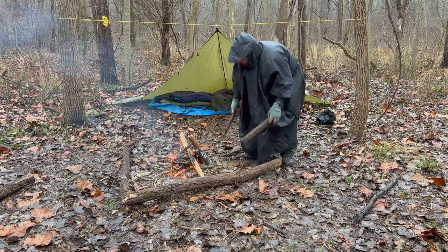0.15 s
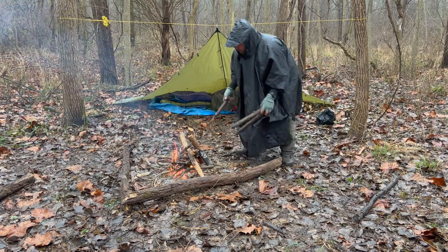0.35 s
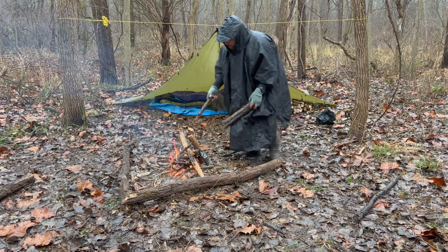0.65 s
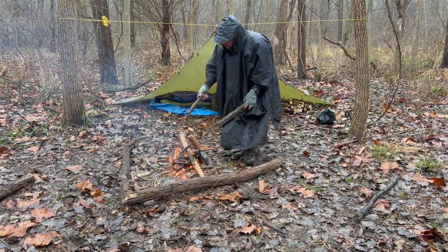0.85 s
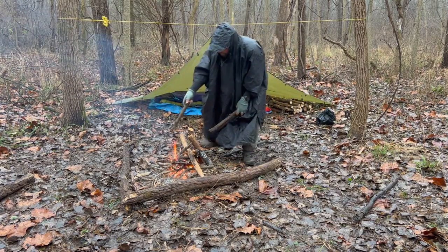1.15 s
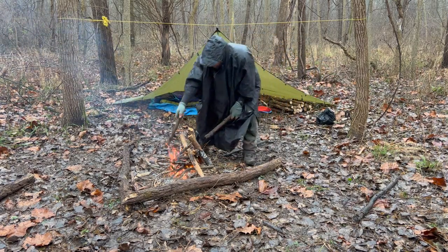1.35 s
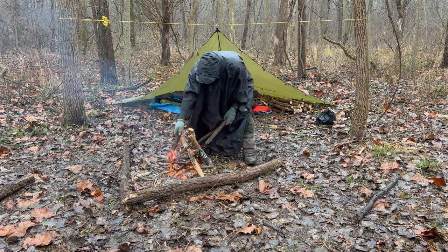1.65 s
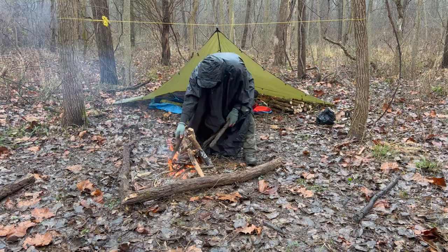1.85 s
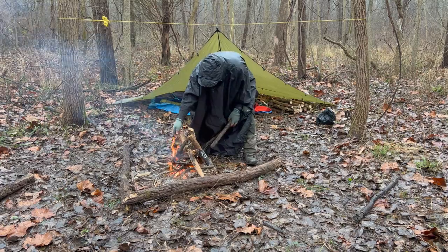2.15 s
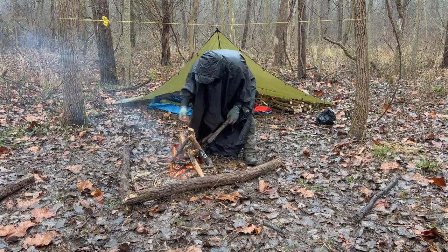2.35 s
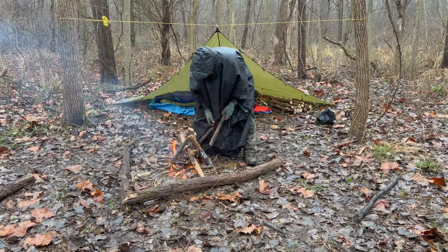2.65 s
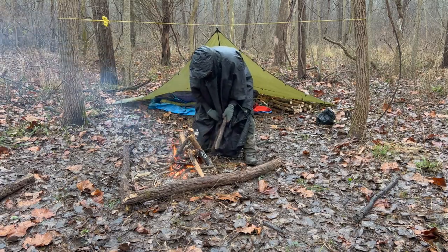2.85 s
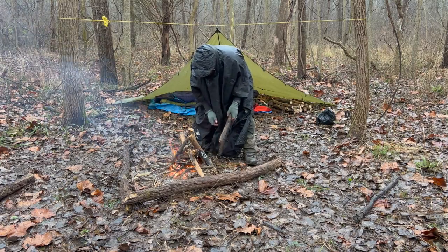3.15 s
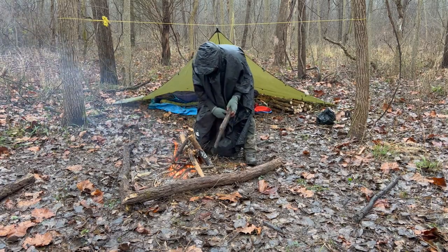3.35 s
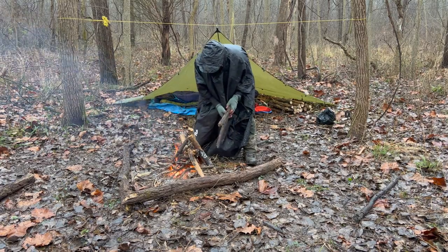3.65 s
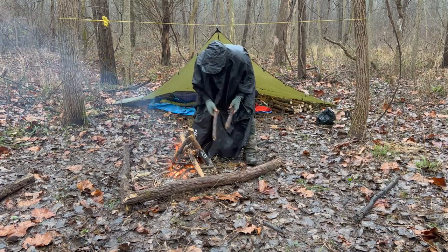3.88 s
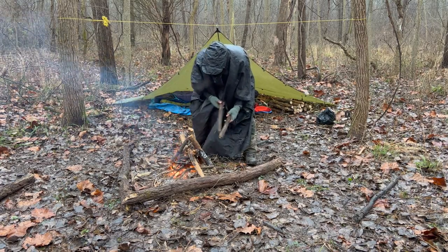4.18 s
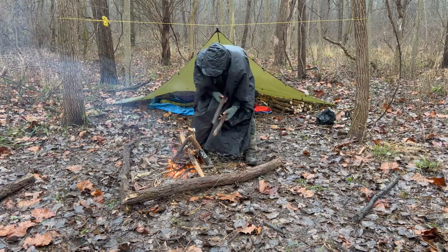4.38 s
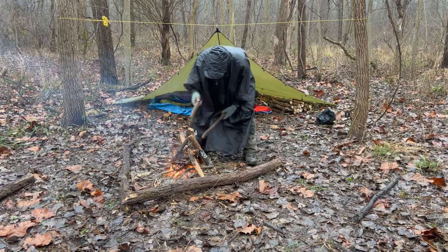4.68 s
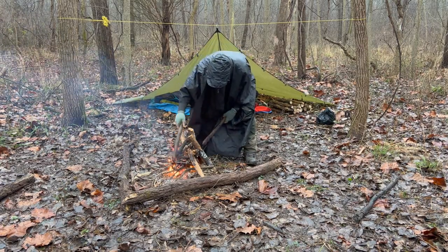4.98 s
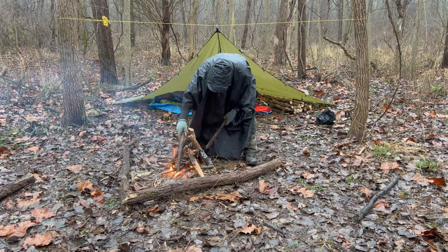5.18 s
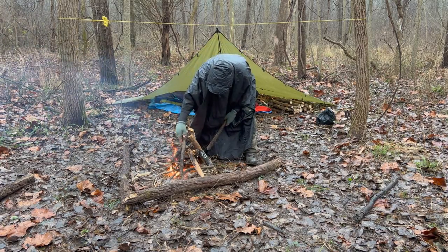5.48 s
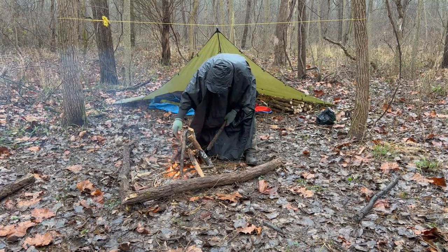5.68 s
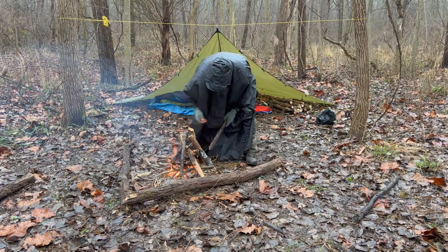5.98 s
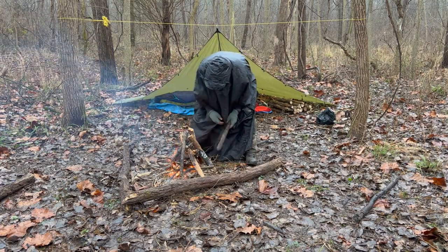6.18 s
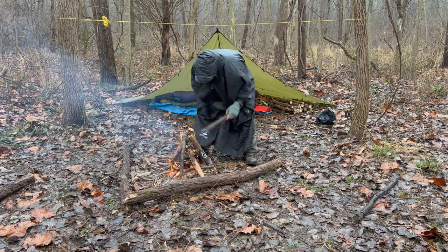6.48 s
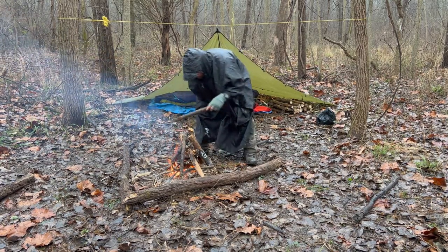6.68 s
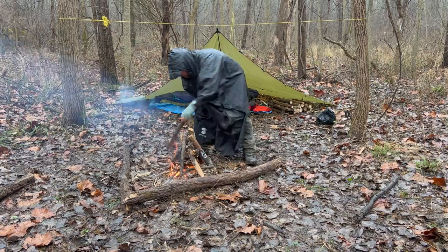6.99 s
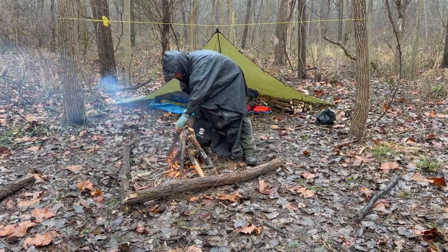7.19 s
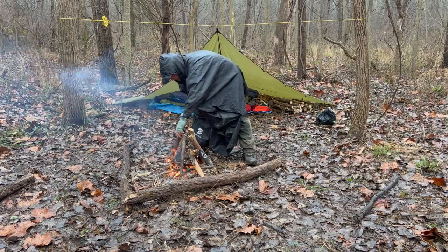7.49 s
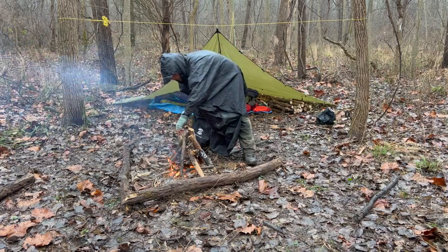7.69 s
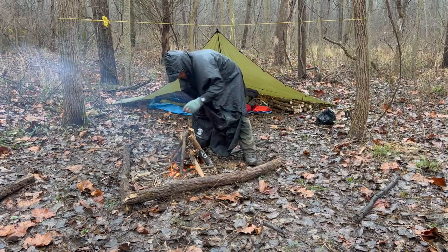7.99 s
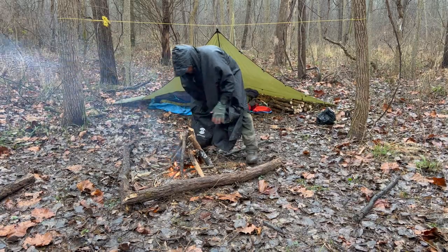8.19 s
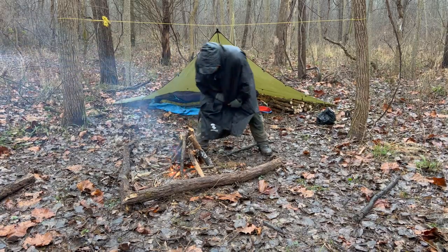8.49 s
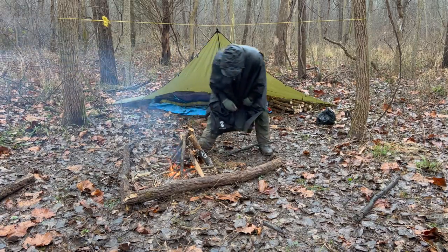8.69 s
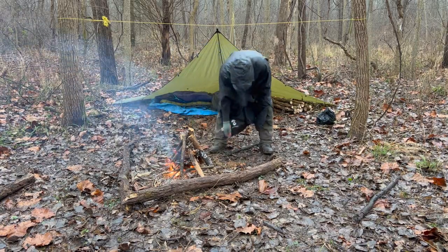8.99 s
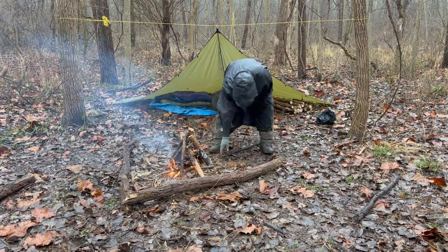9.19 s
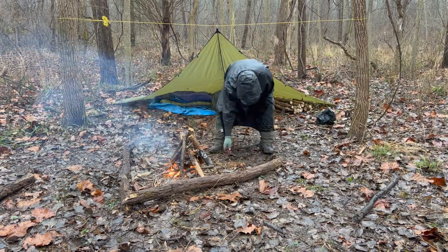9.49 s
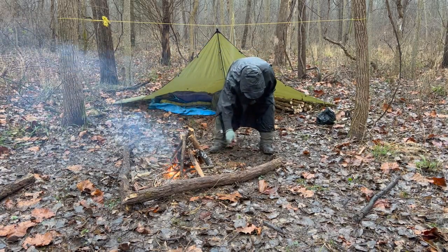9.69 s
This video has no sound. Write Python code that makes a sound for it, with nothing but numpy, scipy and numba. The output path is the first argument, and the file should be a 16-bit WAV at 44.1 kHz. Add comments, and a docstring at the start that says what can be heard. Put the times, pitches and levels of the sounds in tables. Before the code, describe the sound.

Close, irregular drips and fire snaps over fine woodland rain, with soft cloth swishes, a distant low rumble and one brief high bird trill.

```python
"""Rain in a bare wood

Heavy drips tap a taut cover close to the microphone and a small fire snaps nearby: layered damped rings and noise.
Fine drops patter on leaf litter as random clicks, amid rustling and soft swishes of cloth and leaves.
Behind lie a far hiss and a low rumble of coloured noise; a small bird trills once, high up, in gliding sines."""
import sys
import numpy as np
from scipy import signal
from scipy.fft import rfft, irfft
from scipy.io import wavfile
from scipy.ndimage import uniform_filter1d
from numba import njit

SR = 44100
rng = np.random.default_rng(int(sys.argv[2]) if len(sys.argv) > 2 else 0)


def bounce(signal):
    """Save signal as a 16-bit WAV file at the path given by the first command-line argument."""
    frames = np.transpose(np.atleast_2d(signal))
    limited = np.clip(frames, -1, 1)
    pcm = np.round(limited * 32767).astype(np.int16)
    wavfile.write(sys.argv[1], SR, pcm)


N = 433924

# Close taps and snaps. Each row: start in seconds, reference level in dB, nominal ring pitch in Hz,
# then thump, knock, crack and top of the crack in dB re the reference, left minus right in dB.
CLOSE_TAPS = [(0.109, -31.5, 2460, -25, 6, -10, -32, -1.5), (0.283, -35, 2000, -23, -12, -14, -22, 11),
              (0.411, -37, 1620, -4, 8, -8.5, -27, -2.5), (0.49, -25.5, 1560, -17, -18, -9, -10, -1.5),
              (0.65, -37, 2340, -5, 8, -21, -25, 0), (0.854, -36.5, 5140, -6, -14, -10, -25, -4.5),
              (0.944, -33, 1670, -7, -11, -5, -3, 3), (1.1555, -25, 2110, -28, 4, -4, -26, 7.5),
              (1.291, -38.5, 1610, 3, 3, 1, -22, 2), (1.4305, -30.5, 3500, -17, -3, -19, -25, -1),
              (1.436, -25, 2300, -26, -16, -12, -22, 3), (1.474, -30.5, 5240, -20, -20, -3.5, -13, -2),
              (1.546, -34, 2900, -21, -9, 1.5, 5, 3.5), (1.5615, -42, 1000, 2, 15, -16, -25, -2),
              (1.569, -35.5, 4840, -10, -18, 2.5, -23, 6), (1.608, -35.5, 2850, -2, 6, 3, 1, 3),
              (1.666, -44.5, 1000, -9, -6, -2, 1, 1.5), (1.772, -41.5, 1020, -2, 22, -2.5, -24, -1.5),
              (1.926, -29.5, 3000, -28, 4, -9, -18, -2.5), (1.981, -37.5, 990, -17, -19, -5, -24, 15),
              (2.056, -42.5, 1330, -6, -10, 5, -25, -2.5), (2.153, -38, 1150, -11, -5, -13, -29, 3),
              (2.351, -32.5, 1580, -15, -18, -10, -16, 3.5), (2.39, -28, 5100, -4.5, 3.5, -11, -22, -0.5),
              (2.478, -34, 2000, -2, -7, -15, -23, 1), (2.664, -28.5, 1580, -16, -16, -7, -24, -3),
              (2.775, -34, 1060, -1, -14, -6, -25, 2.5), (3.032, -30.5, 1520, -7, -18, -7.5, -22, -2),
              (3.373, -36, 1120, -20, -12, -7, -29, -2.5), (3.416, -29, 1670, -15, -14, -2, -8, 3.5),
              (3.5015, -45, 2300, -10, -4, -8, -20, -4), (3.57, -44, 1300, -8, -8, -2.5, -22, -3),
              (3.795, -37, 1810, -11, -8, -13, -25, -3), (3.767, -38, 1150, -7, -6, -6, -13, -2.5),
              (4.112, -40.5, 1060, 1, -13, 4.5, -27, -2), (4.3, -38, 1070, 0, -6, -16, -18, 2.5),
              (4.355, -27, 1810, 6.5, 10, -4, -15, -1.5), (4.685, -38, 1130, 5.5, 11, -23, -23, 0),
              (4.809, -34, 2100, -16, -16, -4, -22, -5), (4.965, -25.5, 2800, -19, -19, -17, -26, -8.5),
              (5.183, -29.5, 4750, -8, -18, -5.5, 8, 1), (5.494, -34.5, 1200, -19, 12, -3, -24, -4.5),
              (5.6972, -12, 1460, -5, 5.5, -6.5, -33, 0), (5.846, -23, 1410, -2, -1, 1.5, -19, -1.5),
              (5.988, -25, 1170, -5.5, -7, -0.5, -34, 8.5), (6.081, -23.5, 5100, -12, -6, -14, -21, 1),
              (6.121, -31.5, 1310, -0.5, -10, -1, -27, 2), (6.214, -28, 1950, -22, -19, -14.5, -25, -11),
              (6.31, -26.5, 1620, -13, -3, -13, -32, -6), (6.467, -34, 7400, -22, -12, -9, -11, -1),
              (6.541, -31, 1970, -22, -16, -11, -16, 8), (6.606, -39, 6400, -10, -14, -3, -16, -4.5),
              (6.652, -30.5, 1730, -20, -12, -11, -27, -3.5), (6.681, -34.5, 1630, -2, -7, -6, -29, -1.5),
              (6.913, -36, 1390, -11, 9, -6, -20, -2), (6.937, -37, 1220, -14, 18, -0.5, -26, -3),
              (7.151, -34.5, 1370, -8, -7, -1, -11, 5), (7.174, -22.5, 1170, -5.5, 12.5, -7.5, -25, -2),
              (7.204, -30.5, 1150, -8, -9, -14, -21, 3), (7.236, -31, 1150, -5, 14, 5, -13, 3),
              (7.284, -33, 1790, -9, 7, -6, -19, 8.5), (7.427, -33, 1400, -6, 4, -10, -25, 5),
              (7.766, -47.5, 2490, -1, -8, 9, 13.5, 2), (7.815, -10.5, 1960, 0.5, -29, -12, -18, -2),
              (7.917, -27, 1720, -17, -17, -11, 0, 2.5), (7.997, -34, 4400, -13, 1, -4, -17, 8),
              (8.025, -26.5, 1520, -12, -5, -8, -34, -2.5), (8.286, -28, 2630, -17, -23, -7, -11.5, -1.5),
              (8.32, -33, 3300, -13, -18, -7, -18, 0), (8.367, -35.5, 1540, -1, -10, -4, -17, 4),
              (8.408, -35, 2260, -7, -10, -5, -10, 3), (8.663, -41, 2770, -12, -9, -5, 0, 1),
              (8.627, -41.5, 4850, -1, -8, 5, -17, 6.5), (8.711, -37, 5300, -14, -12, -9, -22, -1),
              (8.853, -45, 1100, 3, 0, -12, -25, 0), (8.892, -56, 1450, -10, -8, -1, -22, 0),
              (8.93, -41, 1300, -10, -4, -12, -25, -4), (8.938, -41, 1500, -10, -6, -12, -25, -2),
              (8.918, -37, 1640, -3, -10, -6, -17, -1), (8.968, -28.5, 2620, -11, 5, -5, -13, 4.5),
              (8.9873, -10, 1780, 4.5, 1, -11.5, -19.5, -2), (9.057, -34.5, 1530, -11, 15, -1.5, -25, -3),
              (9.076, -35, 3500, -10, -15, -6, -20, 0.5), (9.097, -28.5, 2880, -14, -5, -29, -23, -2.5),
              (9.162, -29, 1790, -20, -8, -8, -17, -0.5), (9.205, -17, 1290, -6.5, -26, -4, -27, 1.5),
              (9.269, -32.5, 2670, -18, -18, -8.5, -22, -8.5), (9.281, -32.5, 2000, -20, -12, -8, -11, 0.5),
              (9.325, -34.5, 1720, -9, 4, -10, -10, 3.5), (9.4966, -5, 2210, -3, 8.5, -18.5, -27.5, 0.5),
              (9.621, -24.5, 1350, 3, -13, -5, -35, -5.5), (9.711, -33, 3580, -18, 9, -8, -23, 7),
              (9.723, -34.5, 2500, -15, -10, 3, -20, 2.5), (9.757, -31, 1120, -5, 13.5, -11, -19, -0.5),
              (9.831, -34, 1690, -17, -9, -10, -11, -1), (0.1705, -41, 1280, -2, -12, -6, -22, -5),
              (0.181, -43.5, 1360, -2, -10, 2, -22, 1), (0.2254, -44, 2170, -12, -13, -10, -22, -1),
              (0.2658, -39, 2050, -13, -10, -3.5, -16, 1), (0.3017, -37.5, 3540, -10, -10, -8, -16, 0),
              (0.6893, -37, 1390, -5, -10, -7, -30, -5), (0.7836, -43.5, 1530, 1, -10, 4, -18, 4.5),
              (0.9807, -40, 1970, 2, -10, -7, -20, 0), (1.05, -43, 1110, 1, -10, -2.5, -11, -5),
              (1.1962, -35, 1650, -2.5, -10, -5, -16, -4), (1.4566, -36, 2050, -8, -8, -25, -24, -6),
              (1.7494, -35, 2400, -5, -10, -19, -25, -2.5), (1.8188, -37.5, 1710, -3, -7, -8, -26, -2),
              (1.8761, -38, 1970, -11, -12, -17, -22, -1), (2.9637, -41, 1490, -10, -10, -6, -10, -3.5),
              (3.244, -38, 1530, -13, -10, -10, -22, -4), (3.7214, -41, 1110, -7, -10, -5, -11, -3),
              (4.3181, -36, 2290, -7, -10, -12, -17, 0), (4.4448, -48, 2460, -10, -12, -12, -22, -9),
              (4.4608, -44, 1540, -8, -10, 4.5, -13, -2), (4.5057, -39.5, 1030, -5, -10, -13, -22, -1),
              (5.1412, -38.5, 1900, -1, -9, -5, -22, -3), (5.3048, -39.5, 942, 0, -10, -14, -22, -1.0),
              (5.4051, -47, 1270, -10, -12, -10, -22, -13), (5.4665, -40, 2930, -7, -13, -14, -30, -7),
              (5.7633, -36, 3650, -16, -10, -7, -22, -2.5), (5.902, -37, 1640, -2, -10, -16, -22, -4),
              (6.0724, -34.5, 5140, -10, -10, -12, -15, -1.5), (6.102, -44, 3830, -10, -10, -13, -22, -5.5),
              (6.1114, -31, 1050, -10, -10, -23, -25, -8), (6.1464, -39, 1120, -10, -10, -13, -22, -1),
              (6.1823, -37, 1420, -10, -10, -15, -19, 1), (6.2387, -40, 1130, -10, -10, -1, -22, 3),
              (6.2652, -35, 2580, -16, -10, -10, -13, -4.5), (6.3274, -39.5, 1120, -16, -10, -5, -22, -2.5),
              (6.3844, -36.5, 1370, -8, -8, -2.5, -14, -2), (6.4193, -38, 1560, -14, -10, -7, -22, -3),
              (6.4487, -39.5, 2470, -1, -10, -4, -22, -5.5), (6.4867, -43, 3210, -7, -10, 2, -22, -3),
              (6.5071, -41, 1830, -4, -6, -0.5, -22, -9), (6.5291, -41, 2000, -12, -10, 1, -22, -1),
              (6.8194, -40, 3070, -3, -10, -8, -18, -7), (6.9711, -41, 2040, -5, -10, -17, -18, 0),
              (7.0244, -36.5, 1920, -6, -10, -12, -18, 0), (7.4799, -45, 2010, -10, -10, -2, -16, -4),
              (7.6909, -40, 2180, -16, -10, -13, -22, 0), (7.8496, -31, 5280, -12, -10, -6, -20, -3),
              (8.093, -41, 1150, -14, -10, -3, -22, -1), (8.4682, -37, 974, -10, -10, -6, -18, -2.5),
              (9.0428, -36, 1530, -7, -10, -18, -26, -8), (9.1401, -34.5, 1470, -8, -6, -4, -22, -3.5),
              (9.3846, -38, 1390, -10, -10, -6, -13, -5.5), (9.5437, -44, 982, -2, -10, -12, -19, 0),
              (9.5731, -43, 1820, -13, -10, -2, -15, 1)]
# Bird notes. Each row: start in seconds, length in seconds, first, middle and last pitch in Hz, relative level in dB.
BIRD_NOTES = [(4.934, 0.12, 7900, 8240, 7880, -52.5), (5.113, 0.11, 8400, 8300, 8320, -54.5),
              (5.282, 0.12, 8400, 8330, 8100, -55.5)]
# Tone colour of far rain, with a traffic-like rumble at the bottom. Each row: frequency in Hz, relative density in dB.
FAR_COLOUR = [(20, -26), (50, 1.5), (74, 7.5), (95, 0), (120, -3), (200, -11.5), (320, -16), (550, -21),
              (900, -21.5), (2050, -21.5), (4000, -27.5), (6300, -24.5), (8000, -29), (9600, -35),
              (11500, -31.5), (13200, -32), (15500, -69), (17000, -73)]
# Rustle of the rain cape and of leaves underfoot. Each row: time in seconds, relative level in dB.
RUSTLE_LEVEL = [(0.0, -54.5), (0.63, -53.5), (1.75, -54), (2.19, -58), (2.63, -53), (3.07, -55.5),
                (3.3, -52.5), (4.08, -54), (4.33, -47.5), (4.66, -54), (5.45, -53.5), (6.22, -46),
                (6.69, -50.5), (7.18, -48.5), (7.55, -54.5), (7.97, -49), (9.12, -49.5), (9.54, -48),
                (9.84, -50.5)]
# Soft swishes of cloth and leaves. Each row: start in seconds, relative level in dB.
SWISH_HITS = [(.76, -37.5), (1.22, -39.5), (2.47, -38.5), (6.09, -33.5), (6.3, -37.5), (6.45, -45),
              (8.2, -45.5), (8.33, -39.5), (8.43, -42), (8.68, -38), (8.76, -45), (8.82, -43),
              (9.71, -36.5)]

SLAP_DB = -7  # a blow beyond this level rings louder but shorter
BOOM_FULL_DB = -15.5  # a thump beyond this level adds no more boom
WOOD_FULL_DB = -25  # a tap beyond this level adds no more wooden ring
LAG_S_PER_DB = -.00004  # the port that hears a tap louder hears it first
FAINT_PER_S, FAINT_LO_HZ, FAINT_OCTAVES = 6., 990, 2.5
FAR_DB, ALIKE_HZ = -51, 302  # far level; left and right largely agree below this frequency
BIRD_ATTACK_S, BIRD_FADE_DB = 0.012, -7  # fade over one note
SHADE_HZ, SHADE_OCTAVES, SHADE_DB = 5300, 0.67, -4.5  # centre, width, left minus right
TOP_HZ = 16600


def undb(db):
    """Turn decibels into an amplitude factor."""
    return 10 ** (np.asarray(db) / 20)


def curve(rows):
    """Draw straight lines through rows of (seconds, value), one value per sample."""
    times_s, values = np.transpose(rows)
    return np.interp(np.arange(N) / SR, times_s, values)


def walk(rate):
    """Random levels held 1 / rate s and smoothed twice; spread near 1."""
    hold = int(SR / rate)
    steps = np.repeat(rng.standard_normal(N // hold + 1), hold)
    return 1.3 * uniform_filter1d(uniform_filter1d(steps, hold), hold)[:N]


@njit
def ring(out, start, hz, cycles, fall, size, swell):
    """Damped grains: each swells over `swell` turns, loses 1/e in `cycles` turns and sinks by `fall` a turn."""
    for k in range(len(start)):
        f, phase, gain, i = hz[k] / SR, 0., size[k], int(start[k] * SR)
        while abs(gain) > .003 * abs(size[k]) and i < len(out):
            if i >= 0:
                out[i] += gain * (1 - np.exp(-phase / swell)) ** 2 * np.sin(2 * np.pi * phase)
            phase += f
            gain *= 1 - f / cycles[k]
            f *= 1 - f * fall
            i += 1


def grains(s, hz, db, pan_db, cycles, fall, lag_s, sign=0.98, swell=0.26):
    """Damped grains for both ports, panned by level; the left one hears them lag_s later."""
    out = np.zeros((2, N))
    hz = np.clip(hz, 40, .4 * SR)
    settings = np.broadcast_arrays(s, hz, db, pan_db, lag_s, sign, cycles)
    s, hz, db, pan_db, lag_s, sign, cycles = map(np.ravel, settings)
    for port, way in enumerate((.5, -.5)):
        size = sign * undb(db + way * pan_db)
        ring(out[port], s + way * lag_s, hz, cycles, fall, size, swell)
    return out


def burst(s, db, pan_db, lo_hz, hi_hz, spread_s, cycles, tilt_db, lag_s, count):
    """A cluster of tiny clicks for each event, spread over the octaves; tilt_db per octave."""
    chance = rng.random((len(s), count, 4))
    octave = np.log2(hi_hz / lo_hz) * (np.arange(count) + chance[..., 1]) / count
    # most clicks come early, a few straggle
    start = s[:, None] - spread_s * np.log(.04 + .96 * chance[..., 0])
    level_db = db[:, None] + tilt_db * octave + 9 * (chance[..., 3] - .5)
    sign = np.sign(chance[..., 2] - .5)
    return grains(start, lo_hz * 2 ** octave, level_db, pan_db[:, None], cycles, 0., lag_s[:, None], sign)


def scatter(s, db, after_s, rise_s, fade_s, lo_hz, hi_hz):
    """A short swell of band-limited noise after each event, different left and right."""
    hits = np.zeros(N)
    np.add.at(hits, ((s + after_s) * SR).astype(int) % N, undb(2 * db))
    age = np.arange(int(.25 * SR)) / SR
    swell = (1 - np.exp(-age / rise_s)) ** 2 * np.exp(-2 * age / fade_s)
    power = signal.fftconvolve(hits, swell)[:N]
    band = signal.butter(2, [lo_hz, hi_hz], "bandpass", fs=SR, output="sos")
    return np.sqrt(np.abs(power)) * signal.sosfilt(band, rng.standard_normal((2, N)))


def patter(per_s, level, scatter_db, lo_hz, hi_hz, spread_s, cycles, tilt_db, wide_db, count):
    """Clicks at random moments all around, a few much bigger than the rest; level holds rows of (s, dB)."""
    chance = rng.random((12000, 4))
    s = np.cumsum(-np.log(chance[:, 0])) / per_s
    size_db = np.minimum(-np.log(chance[:, 1]), 2.5) * scatter_db
    level_db = np.interp(s, *np.transpose(level)) + size_db
    pan_db = wide_db * (chance[:, 2] - .5) - 1.5
    lag_s = 0.00022 + .0008 * (chance[:, 3] - .5)
    heard = s < N / SR
    return burst(s[heard], level_db[heard], pan_db[heard], lo_hz, hi_hz, spread_s, cycles, tilt_db,
                 lag_s[heard], count)


def far():
    """Coloured noise for hiss and rumble; the hiss follows the rustle a little, the bass sits near the middle."""
    hz = np.maximum(np.fft.rfftfreq(N, 1 / SR), 1)
    colour_hz, colour_db = np.transpose(FAR_COLOUR)
    colour = undb(np.interp(np.log(hz), np.log(colour_hz), colour_db))
    alike = 1 / (1 + (hz / ALIKE_HZ) ** 3.9) * .97
    mid = rfft(rng.standard_normal(N)) * colour * np.sqrt(1 + alike)
    side = rfft(rng.standard_normal(N)) * colour * np.sqrt(1 - alike)
    both = np.array([mid + side, mid - side])
    low, high = irfft(both * alike, N), irfft(both * (1 - alike), N)
    swell_db = 0.3 * (curve(RUSTLE_LEVEL) + 62) + 1.5 * walk(18)
    out = low * undb(.8 * walk(3)) + high * undb(swell_db)
    return out * undb(FAR_DB) / np.std(low + high)


def fine_drops():
    """Fine rain on leaf litter: a dense patter of very short, bright clicks."""
    return patter(700., [(0, -58.0)], 4.4, 1140.0, 17000.0, 0.00051,
                  cycles=0.45, tilt_db=5.5, wide_db=26, count=3)


def heavy_drops():
    """Heavier drops: a sparser patter of broad click clusters."""
    return patter(45., [(0, -53.5)], 3.4, 416.0, 14900.0, .0016,
                  cycles=0.9, tilt_db=2.5, wide_db=18.5, count=10)


def leaf_drops():
    """Fat drops on single leaves: each rings briefly at its own pitch."""
    return patter(50., [(0, -50)], 4.7, 1570.0, 6900.0, .001,
                  cycles=2.73, tilt_db=0.7, wide_db=18, count=1)


def rustle():
    """Cape and leaves: crowded mid-range clicks that swell and ebb together."""
    clicks = patter(220., RUSTLE_LEVEL, 5.5, 616.0, 5500.0, 0.0033,
                    cycles=0.74, tilt_db=1.5, wide_db=7, count=5)
    return undb(-4.0) * clicks


def cape_ticks():
    """Single drips and creases of the cape: short dry ticks, in step with the rustle."""
    ticks = patter(110., RUSTLE_LEVEL, 2.35, 1180.0, 5400.0, .003,
                   cycles=2.15, tilt_db=1.5, wide_db=4, count=2)
    return undb(-1.0) * ticks


def faint_taps():
    """Fainter taps by chance, in rows like those of CLOSE_TAPS; low rings are the most common."""
    chance = rng.random((200, 2))
    s = np.cumsum(-np.log(chance[:, 0])) / FAINT_PER_S
    # reference level, thump, knock, crack, top of the crack, left minus right, all in dB
    middle_db = np.array([-49.5, 6, -25, -14, -6, 2])
    spread_db = np.array([2.7, 3.7, 4, 2.8, 13, 6.5])
    levels = middle_db + spread_db * np.clip(rng.standard_normal((200, 6)), -2, 1.2)
    ring_hz = FAINT_LO_HZ * 2 ** (FAINT_OCTAVES * chance[:, 1] ** 2)
    return np.column_stack([s, levels[:, 0], ring_hz, levels[:, 1:]])[s < N / SR]


def taps(rows):
    """Bending waves in the cover carry treble fastest: crack first, then ring and knock, last a sinking thump."""
    s, db, ring_hz, thump_db, knock_db, crack_db, top_db, pan_db = np.transpose(rows)
    lag_s = np.clip(LAG_S_PER_DB * pan_db, -.0004, .0004)
    top = burst(s + 0.00038, db + top_db, pan_db, 10800.0, 12500.0, 0.0014,
                cycles=9.0, tilt_db=6.5, lag_s=.4 * lag_s, count=6)
    crack = burst(s + .0005, db + crack_db, pan_db - 4.5, 3360.0, 8060.0, .0009,
                  cycles=2.35, tilt_db=2.0, lag_s=.7 * lag_s, count=6)
    hardest = db > SLAP_DB
    body = grains(s + 0.0009 + .0004 * hardest, 1.113 * ring_hz, db + 12.0 + 7.5 * hardest, pan_db,
                  cycles=1.2 - 0.41 * hardest, fall=0.045, lag_s=lag_s, sign=-0.85, swell=0.85)
    # a higher second ring leans to the other side
    second = grains(s + 0.001927, 1.28 * ring_hz, db - 14.5, -pan_db,
                    cycles=3.8, fall=0.073, lag_s=0.00028, swell=0.79)
    after = grains(s + 0.0087, 0.92 * ring_hz, db - 19.0, pan_db + 1.0,
                   cycles=2.6, fall=0.033, lag_s=lag_s)
    knock = grains(s + 0.00189, 1250.0, db + knock_db, pan_db, cycles=0.45, fall=0.6, lag_s=0.0001)
    thump = grains(s + 0.0027, 600.0, db + thump_db + 2.5, pan_db - 1.0,
                   cycles=0.64, fall=0.47, lag_s=0.00039)
    boom_db = np.minimum(db + thump_db, BOOM_FULL_DB) - 4.5
    boom = grains(s + 0.0045, 185.0, boom_db, pan_db, cycles=0.95, fall=0.25, lag_s=0.00022)
    # a few chance wooden modes ring on for some milliseconds
    wood = burst(s + 0.001253, np.minimum(db, WOOD_FULL_DB) - 16.5, pan_db, 874.0, 3360.0, 0.001475,
                 cycles=2.13, tilt_db=6.5, lag_s=lag_s, count=4)
    # spray and the echo off the ground follow
    spray = scatter(s, db + crack_db + 0.5, 0.0085, 0.0011, 0.0037, 250.0, 5100.0)
    # a faint noisy tail runs under the tap from its start
    tail = scatter(s, db - 19.0, 0.00081, 0.00096, 0.012, 270.0, 5000.0)
    return top + crack + body + second + wood + after + knock + thump + boom + spray + tail


def swishes():
    """Cloth and leaves brush past: soft noise swells with a slower, fainter treble, roughened in level."""
    s, db = np.transpose(SWISH_HITS)
    brush = scatter(s, db, .001, 0.012, 0.049, 620.0, 3100.0)
    air = scatter(s, db - 20.5, .001, 0.029, 0.079, 5200.0, 17000.0)
    return (brush + air) * undb(4.9 * walk(90))  # uneven, grainy level


def bird():
    """Three thin warbling notes that swell fast and fade, smeared by echoes among the trunks."""
    t = np.arange(N) / SR
    tone, warble = 0, 1 + 0.016 * walk(300)
    for s, length_s, first_hz, mid_hz, last_hz, db in BIRD_NOTES:
        part = (t - s) / length_s
        hz = np.interp(part, [0, .5, 1], [first_hz, mid_hz, last_hz]) * warble
        edge = np.clip(np.minimum(t - s, s + length_s - t) / BIRD_ATTACK_S, 0, 1)
        level = undb(db + BIRD_FADE_DB * np.clip(part, 0, 1))
        tone = tone + np.sin(2 * np.pi * np.cumsum(hz) / SR) * edge * level
    tone = tone * undb(3 * walk(140))  # ragged level
    age = t[:int(.3 * SR)]
    trunks = rng.standard_normal((2, len(age))) * np.exp(-age / 0.037)
    trunks = trunks / np.sqrt(np.sum(trunks ** 2, axis=1, keepdims=True))
    return 0.5 * tone + 1.8 * signal.fftconvolve(tone[None], trunks, axes=1)[:, :N]


def scene():
    """Lay the close sounds and the bird over the rain."""
    rain = far() + fine_drops() + heavy_drops() + leaf_drops()
    cape = rustle() + cape_ticks()
    tapping = taps(np.vstack([CLOSE_TAPS, faint_taps()]))
    return rain + cape + tapping + swishes() + bird()


def record(dry):
    """The left port is shaded in the low treble; the recorder cuts the top."""
    hz = np.maximum(np.fft.rfftfreq(N, 1 / SR), 1)
    octaves = np.log2(hz / SHADE_HZ) / SHADE_OCTAVES
    shade_db = np.array([[.5], [-.5]]) * SHADE_DB * np.exp(-octaves ** 2)
    shaded = irfft(rfft(dry) * undb(shade_db), N)
    return signal.sosfilt(signal.ellip(10, .2, 80, TOP_HZ, fs=SR, output="sos"), shaded)


dry = scene()
out = record(dry)
bounce(out)
```